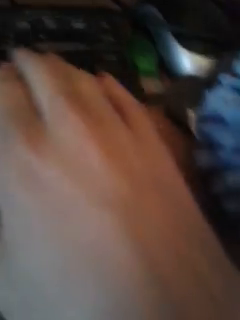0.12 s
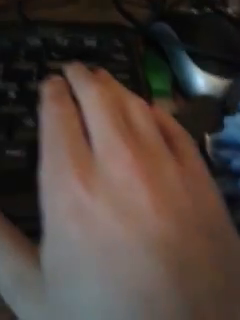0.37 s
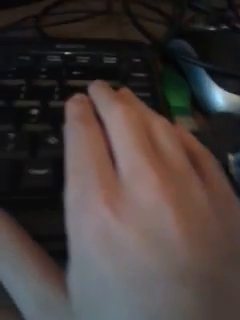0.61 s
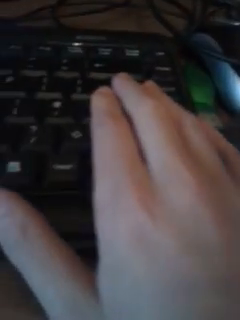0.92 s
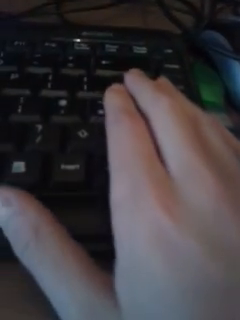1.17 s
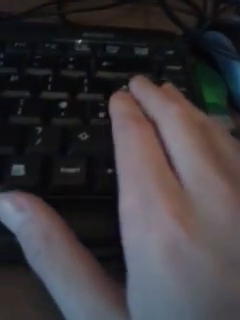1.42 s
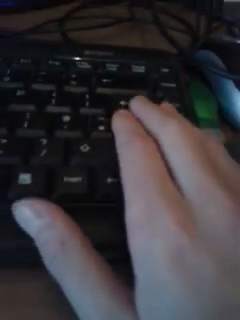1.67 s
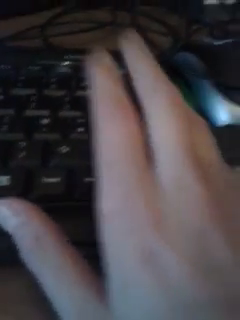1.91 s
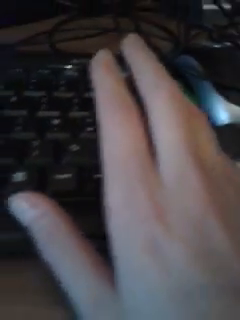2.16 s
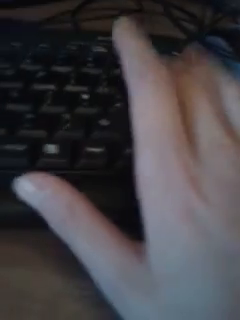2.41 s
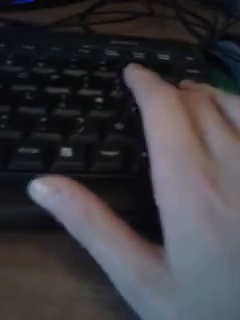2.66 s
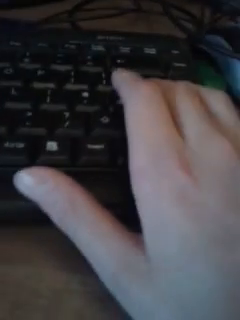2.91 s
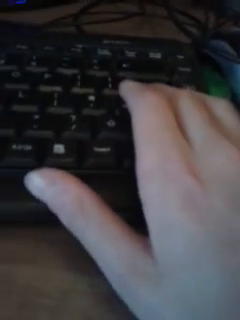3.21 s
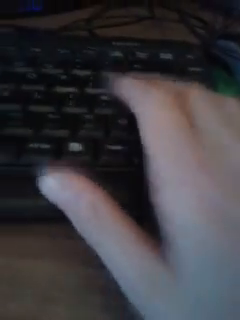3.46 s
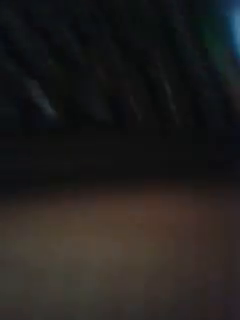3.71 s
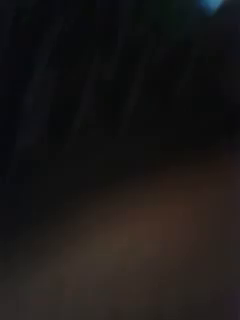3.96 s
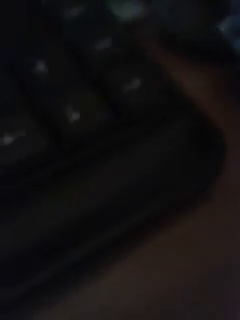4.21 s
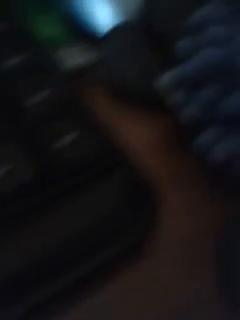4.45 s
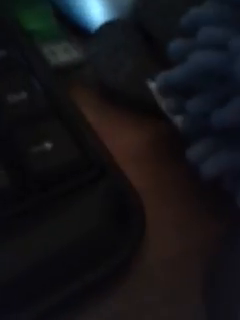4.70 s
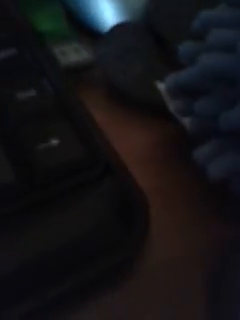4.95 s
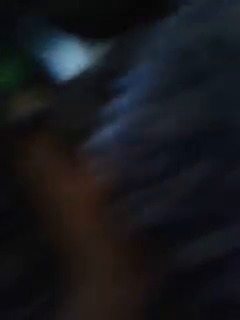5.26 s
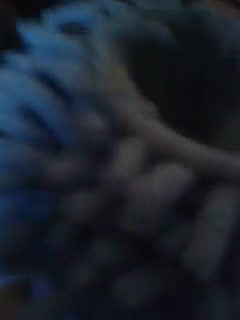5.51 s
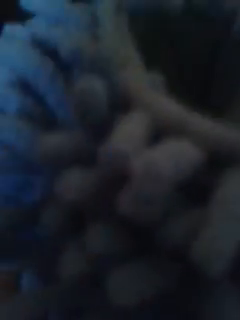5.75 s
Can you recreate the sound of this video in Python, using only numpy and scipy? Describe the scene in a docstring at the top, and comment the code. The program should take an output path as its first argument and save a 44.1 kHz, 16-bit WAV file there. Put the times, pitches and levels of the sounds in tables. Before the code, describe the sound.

Faint plastic ticks in a quiet room, then loud keyboard clacks, a gritty finger slide with a sharp pop, soft knocks and final keystrokes.

```python
"""Soft key clacks and small ticks of a phone's case open the scene; loud keys follow after two seconds.
Then a finger slides over the case as the hand-held phone swings, and the case pops and creaks.
Later a key clacks, a wrist knocks on the desk, and two last keys are struck in the small quiet room.
Each blow is a tiny noisy scrape that sets resonances ringing; slide, cloth brushes and hand jolts
are coloured noise that rises and falls. A steady hiss of microphone and room lies under it all."""
import sys
import numpy as np
from scipy import signal
from scipy.fft import rfft, irfft, next_fast_len
from scipy.io import wavfile
from scipy.ndimage import uniform_filter1d, map_coordinates

SR = 44100
rng = np.random.default_rng(int(sys.argv[2]) if len(sys.argv) > 2 else 0)


def digitize_waveform(pressure):
    """Quantize a signal to 16-bit integers and store it at the path in sys.argv[1].

    Rows of a 2-D input are taken as channels; values are limited to [-1, 1].
    """
    field = np.atleast_2d(pressure).T
    bounded = np.clip(field, -1, 1)
    quanta = np.round(bounded * 32767).astype(np.int16)
    wavfile.write(sys.argv[1], SR, quanta)


def voltage_ratio(decibels):
    """Convert decibels (scalar or array-like) to amplitude ratios, 20 dB per decade."""
    exponent = np.asarray(decibels, float) / 20
    return 10 ** exponent


N = 258867  # samples in the scene

# Every level below comes before the trims and lifts in the functions. Spectrum levels are relative.
# key strokes, one row a key: (rattle f/Hz, snap f/Hz, snap over rattle/dB),
# then its contacts: (t/s, clack level/dB, clack f/Hz, rattle over clack/dB)
KEY_STROKES = [((2740, 5000, -22), [(0.014, -53, 510, -0.5), (0.124, -50, 790, -21), (0.186, -47, 1300, -5),
               (0.214, -42, 1230, -21)]), ((2750, 5100, -4), [(0.324, -49, 1390, -14),
               (0.362, -47, 2370, -10.5), (0.379, -51.5, 1180, -5)]), ((3300, 4400, -0.32),
               [(1.375, -53, 1220, 9)]), ((3500, 5430, -4), [(2.25, -15.5, 1480, -5),
               (2.255, -22, 2350, -13.5), (2.261, -15, 1260, -19), (2.273, -26.5, 970, -10),
               (2.283, -17, 1170, -23), (2.306, -47, 1040, 0), (2.358, -43, 1280, 0),
               (2.364, -23, 995, -22)]), ((3620, 4300, -10.5), [(2.449, -18, 1585, -7),
               (2.454, -27, 880, 2), (2.464, -27.5, 2350, -12), (2.48, -29.5, 880, -17)]),
               ((3800, 4740, -10), [(3.422, -36, 1110, -7.5), (3.434, -39, 1145, -27)]),
               ((2300, 4350, 0.44), [(4.599, -34, 1070, -6.5), (4.606, -23.5, 1570, -11.5),
               (4.61, -22, 1900, -4.5), (4.62, -32.5, 930, -30), (4.633, -46, 1790, -16)]),
               ((3000, 4600, 7.5), [(5.514, -47, 1710, -17), (5.519, -33.5, 1640, -39),
               (5.529, -36.5, 900, 0), (5.546, -38.5, 900, -15)]), ((3420, 5720, -16),
               [(5.796, -27.5, 645, 4.5), (5.806, -26, 950, 1), (5.817, -34, 1040, -14),
               (5.833, -42, 1180, -22), (5.847, -37, 1150, -10), (5.854, -41, 770, -25),
               (5.861, -59, 1140, -18)])]
# ticks of the phone's case: (t/s, clack level/dB, clack f/Hz, rattle over clack/dB, snap over clack/dB)
CASE_TICKS = [(0.249, -62, 430, -13, -6), (0.298, -59, 423, -9, -4), (0.41, -64, 500, -14, -2),
              (0.475, -62, 595, -12, -1), (0.534, -58.5, 711, -14, -6), (0.548, -55, 680, -23, -8),
              (0.58, -58, 732, -23, 3), (0.616, -69.5, 662, -14, 14.5), (0.799, -55, 590, -14, -7),
              (0.879, -58.5, 517, -18, -1), (0.946, -57.5, 514, -8, -1), (1.001, -54, 501, -10, -1.5),
              (1.107, -55, 600, -15, -9.5), (1.192, -49, 650, -21, -12), (1.251, -61.5, 410, -2.5, 1.5),
              (1.286, -66, 401, -6, 9.5), (1.338, -59, 483, -3, 1), (1.686, -50.5, 637, -19, -10.5),
              (1.749, -57.5, 480, -13, -2.5), (3.219, -52.5, 1490, -14, -10), (3.539, -49, 501, -19, -16),
              (3.579, -40.5, 1270, -35, -6), (3.671, -27.5, 1710, -13, -12.5), (3.876, -35, 575, -26, -6),
              (4.05, -29, 1550, -35, -26), (4.054, -25.5, 2140, -35, -6.1), (4.679, -52, 900, -12, -11),
              (4.779, -54, 595, -0.5, -17.5), (4.929, -36.5, 504, -24, -41), (5.365, -36, 564, -41, -34)]
# resonances of keyboard and desk: (f/Hz, width/Hz, level/dB)
BOARD_MODES = [(164, 33, 8.5), (304, 120, -6.5), (487, 198, 13), (701, 160, 11.5), (900, 160, 12.5),
               (1150, 990, 4.5), (1482, 177, 8), (1930, 600, 5), (2800, 320, 3), (3230, 420, 6.5),
               (4050, 330, 2.5), (4740, 2600, -5), (5200, 1500, -3.5), (6800, 2000, 3.5)]
# resonances of the phone's case and microphone port: (f/Hz, width/Hz, level/dB)
CASE_MODES = [(278, 170, 7), (665, 530, 10.5), (1340, 1150, 13), (2520, 1750, -3.5), (3730, 770, 0.5),
              (5270, 3700, -5.5), (7260, 170, -14.5)]
# how long the room takes to die away by 60 dB: (f/Hz, t/s)
ROOM_DECAY = [(250, 0.78), (600, 0.28), (1500, 0.3), (3500, 0.18), (7000, 0.23)]
# the long slide as the phone swings, pausing once: (t/s, hiss level/dB, body level/dB)
SLIDE_LEVELS = [(3.6, -63, -64), (3.63, -46, -59), (3.68, -43.5, -57.5), (3.73, -41, -61), (3.79, -43, -55),
                (3.85, -42.5, -58.5), (3.885, -41.5, -45.5), (3.9, -47, -59.5), (3.96, -46, -54.5),
                (4.04, -58.5, -67.5), (4.08, -67, -59), (4.105, -47, -65), (4.165, -51.5, -61),
                (4.185, -62, -64.5)]
# colour of the skin's hiss: (f/Hz, level/dB)
SKIN_HISS_COLOUR = [(1500, -39.5), (2600, -26.5), (3400, -17), (4300, -15), (5800, -5), (6400, -11),
                    (7000, -10), (9500, -12.5)]
# colour of the case's body sound under the finger: (f/Hz, level/dB)
SKIN_BODY_COLOUR = [(300, -10), (600, 3), (1300, 2), (2300, 3.5), (3500, -1), (5000, -33.5)]
# short finger rubs on the case: (start t/s, end t/s, hiss level/dB, body level/dB)
FINGER_RUBS = [(1.29, 1.3, -52.5, -78), (1.338, 1.35, -56.5, -73), (2.938, 2.956, -51.5, -72),
               (3.25, 3.263, -46, -66), (3.535, 3.558, -51, -62), (3.578, 3.594, -48, -57.5),
               (4.84, 4.88, -56, -56)]
# sleeve and hand brushing the desk: (start t/s, end t/s, level/dB)
DESK_BRUSHES = [(0, .05, -62), (.1, .24, -64.5), (.3, .41, -66), (1.3, 1.45, -66), (3.39, 3.43, -59.5),
                (4.17, 4.3, -68), (4.35, 4.48, -65), (4.78, 4.9, -58.5), (5.18, 5.33, -66)]
# colour of the brushing: (f/Hz, level/dB)
BRUSH_COLOUR = [(300, -23.5), (700, -1.5), (1300, 4.5), (2500, -2.5), (4000, -5), (7000, -7)]
# jolts of the phone in the hand: (t/s, level/dB)
HAND_JOLTS = [(2.32, -64), (3.68, -68.5), (3.821, -70), (3.96, -59.5), (4.07, -68), (4.65, -84),
              (4.89, -81)]
# colour of jolts and tremor: (f/Hz, level/dB)
SHAKE_SPECTRUM = [(12, -35.5), (25, 9.5), (50, -1.5), (80, -9.5), (130, -31), (200, -61.5)]
# colour of the microphone and room hiss: (f/Hz, level/dB)
HISS_COLOUR = [(53, -64.5), (90, -15), (106, -28.5), (249, -7.5), (288, -9), (410, -3.5), (615, -3),
               (1010, -5.5), (1110, -6.5), (2600, -7.5), (3620, -10), (6790, -12.5), (7450, -13.5),
               (9680, -65), (16400, -120)]
# the phone's band limit with a weak leak above it: (f/Hz, level/dB)
PHONE_BAND = [(20, 1.5), (7000, 1.5), (7400, -15), (7900, -21.5), (8500, -36), (9100, -38), (9400, -80)]
# creaks, each a row of even slips: (first slip t/s, end limit t/s, gap t/s, middle level/dB, clack f/Hz)
CASE_CREAKS = [(3.957, 3.98, 0.0065, -33.5, 1660), (4.179, 4.21, 0.013, -45.5, 2450),
               (4.228, 4.249, 0.008, -45.5, 2200)]
# sharp pops, a seam of the case letting go at once: (t/s, level/dB, f/Hz, snap over pop/dB)
CASE_POPS = [(2.937, -48, 1300, 15), (3.251, -40.5, 1420, 6), (3.821, -19.5, 1300, -20)]
# wrist knocks that make the keyboard shudder: (t/s, level/dB, f/Hz, upper ring over knock/dB)
WRIST_KNOCKS = [(4.773, -41, 716, -18), (4.833, -32, 563, 0.7), (4.842, -39, 510, 1.5),
                (4.859, -38, 570, -9), (4.875, -47.5, 570, 3), (4.889, -47, 593, 5.5), (4.92, -43, 526, -2),
                (4.951, -50.5, 486, 1), (4.985, -48.5, 604, -10)]

BLOW_SAMPLES = 16384  # room for one blow and its echo
THUD_HZ = 304.4  # the low thud in every blow
CASE_RATTLE_HZ, CASE_SNAP_HZ = 2990, 5640


def unit(x):
    """Scales a sound to rms 1."""
    return x / np.sqrt(np.mean(x ** 2) + 1e-20)


def along(points, hz):
    """Reads a (f/Hz, value) table on a log pitch axis; the end values hold beyond the ends."""
    f, value = np.transpose(points)
    return np.interp(np.log(hz + 1), np.log(f + 1), value)


def curves(rows):
    """Draws each level column over time, at -120 dB outside its rows."""
    s, *columns = np.transpose(rows)
    t = np.arange(N) / SR
    return [np.interp(t, s, column, -120, -120) for column in columns]


def strokes(rows, attack_s, release_s):
    """Rise, hold, then an exponential fade; one envelope for each level column."""
    t = np.arange(N) / SR
    total = 0
    for start, end, *db in rows:
        rise = np.clip((t - start) / attack_s, 0, 1)
        fade = np.exp(-np.maximum(t - end, 0) / release_s)
        total = total + voltage_ratio(np.array(db))[:, None] * rise * fade
    return total


def wobble(rate):
    """A smooth random curve through `rate` chance values a second."""
    knots = rng.standard_normal(int(N * rate / SR) + 4)
    return map_coordinates(knots, [np.arange(N) * rate / SR])


def coloured(x, spectrum):
    """Filters x through a (f/Hz, level/dB) spectrum."""
    size = next_fast_len(N + 8192)
    gain = voltage_ratio(along(spectrum, np.fft.rfftfreq(size, 1 / SR)))
    return irfft(rfft(x, size) * gain, size)[:N]


def noise(spectrum, grain_db=0):
    """Coloured noise of rms 1; a fast random flutter of its level makes it grainy."""
    white = rng.standard_normal(N)
    return unit(coloured(white * voltage_ratio(grain_db * wobble(300)), spectrum))


def resonance(f, hz, width):
    """A causal resonance with steep skirts."""
    return (1j * f * width / (hz * hz - f * f + 1j * f * width)) ** 2


def echo_tail():
    """A fresh random room answer of energy 1, each frequency dying at its own speed."""
    hz, t, z = signal.stft(rng.standard_normal(BLOW_SAMPLES), SR, nperseg=256)
    fade = voltage_ratio(-60 * t / along(ROOM_DECAY, hz)[:, None])
    tail = signal.istft(z * fade, SR, nperseg=256)[1][:BLOW_SAMPLES]
    tail *= 1 - np.exp(-np.arange(BLOW_SAMPLES) / SR / 0.00035)  # a very quick fade-in
    return tail / np.linalg.norm(tail)


def short_scrape(scrape_ms):
    """A burst of noise that swells for scrape_ms and dies, with an evened-out spectrum."""
    u = np.arange(BLOW_SAMPLES) / SR * 1000 / scrape_ms
    burst = rfft(rng.standard_normal(BLOW_SAMPLES) * u * np.exp(-u))
    even = irfft(burst / uniform_filter1d(abs(burst), size=150), BLOW_SAMPLES)
    return rfft(even * (u < 12))


def contacts(table, modes, scrape_ms, spread, thud_db, treble_db, own_db, sharpness, room_db):
    """Each blow is a scrape: the struck part rings at its own pitches, the body at resonances nearby.

    table: (t/s, clack level/dB, clack f/Hz, rattle f/Hz, rattle/dB, snap f/Hz, snap/dB); spread in octaves.
    """
    out = np.zeros(N + BLOW_SAMPLES)
    f = np.fft.rfftfreq(BLOW_SAMPLES, 1 / SR)
    hz, width, level_db = np.array(modes).T[:, :, None]
    signs = (-1) ** np.arange(len(hz))[:, None]  # neighbours move in opposite directions
    rings = voltage_ratio(level_db) * resonance(f, hz, width) * signs
    for s, db, clack_hz, rattle_hz, rattle_db, snap_hz, snap_db in table:
        scrape = short_scrape(scrape_ms)
        strengths = voltage_ratio(3.5 * rng.standard_normal(len(hz)))
        push_db = thud_db + 0.47 * db  # harder blows have more thud
        parts = [(THUD_HZ, push_db), (clack_hz, 0),
                 (rattle_hz, rattle_db + treble_db), (snap_hz, snap_db + treble_db)]
        blow = to_walls = 0
        for centre_hz, part_db in parts:
            octaves = np.log2(hz[:, 0] / centre_hz)
            near = 1 / (1 + (octaves / spread) ** 4)
            own = voltage_ratio(own_db) * resonance(f, centre_hz, 90 + centre_hz / sharpness)
            body = near * strengths @ rings
            peak = abs(irfft(scrape * (body + own), BLOW_SAMPLES)).max()
            force = voltage_ratio(db + part_db) * scrape / peak
            blow = blow + force * (body + own)
            # the small part beams forward, so the walls hear mostly the body
            to_walls = to_walls + force * (body + 0.37 * own)
        echo = to_walls * voltage_ratio(room_db) * rfft(echo_tail())
        out[round(s * SR):][:BLOW_SAMPLES] += irfft(blow + echo, BLOW_SAMPLES)
    return out[:N]


def background_hiss():
    """Microphone and room hiss: steady coloured noise."""
    return voltage_ratio(-64.5) * noise(HISS_COLOUR)


def hand_tremor():
    """Low noise from the hand: a faint wavering tremor, with jolts that swell and fade."""
    t = np.arange(N) / SR
    jolts = sum(voltage_ratio(db) * np.exp(-abs(t - s) / 0.05) for s, db in HAND_JOLTS)
    tremor = voltage_ratio(-82.5 + 0.5 * wobble(4.9))
    return (jolts + tremor) * noise(SHAKE_SPECTRUM)


def desk_brushing():
    """Sleeve and hand rub the desk: grainy noise in soft strokes."""
    envelope = strokes(DESK_BRUSHES, attack_s=0.022, release_s=0.049)[0]
    return envelope * noise(BRUSH_COLOUR, grain_db=-1.5)


def finger_on_case():
    """Skin friction makes a grainy hiss and a lower body sound, in short rubs and one long slide."""
    rubs = strokes(FINGER_RUBS, attack_s=0.006, release_s=0.0026)
    hiss, body = rubs + voltage_ratio(np.array(curves(SLIDE_LEVELS)))
    skin_hiss = hiss * noise(SKIN_HISS_COLOUR, grain_db=1.7)
    return skin_hiss + body * noise(SKIN_BODY_COLOUR, grain_db=3.5)


def case_pops():
    """One abrupt push into the whole case, hardly any ring; a creak is a quick row of small ones."""
    creak_snap_db, slip_scatter_db = -20, 2.5
    slips = []
    for first, last, gap, db, hz in CASE_CREAKS:
        for s in np.arange(first, last, gap):
            slip_db = db + slip_scatter_db * rng.standard_normal()
            slips.append((s, slip_db, hz, creak_snap_db))
    table = [(s, db, hz, CASE_RATTLE_HZ, -24, CASE_SNAP_HZ, snap_db)
             for s, db, hz, snap_db in list(CASE_POPS) + slips]
    return contacts(table, CASE_MODES, scrape_ms=0.068, spread=0.99, thud_db=-15, treble_db=-12,
                    own_db=9, sharpness=4.4, room_db=-16)


def case_ticks():
    """Plastic ticks right at the microphone, almost dry; their high pitches vary by chance."""
    s, db, hz, rattle_db, snap_db = np.transpose(CASE_TICKS)
    scatter = [0.061, 0.031]  # of rattle and snap pitch, as natural logs
    rattle, snap = np.exp(rng.standard_normal((len(s), 2)) * scatter).T
    table = zip(s, db, hz, CASE_RATTLE_HZ * rattle, rattle_db, CASE_SNAP_HZ * snap, snap_db)
    ticks = contacts(table, CASE_MODES, scrape_ms=0.65, spread=0.32, thud_db=-13.0, treble_db=15.0,
                     own_db=5.5, sharpness=14.8, room_db=-22)
    return voltage_ratio(-5.5) * ticks


def desk_knocks():
    """The wrist's soft blows: each rings broadly and wakes mainly the resonances near its pitches."""
    ring_hz, edge_hz, edge_db = 1217, 2450, -15
    table = [(s, db, hz, ring_hz, ring_db, edge_hz, edge_db) for s, db, hz, ring_db in WRIST_KNOCKS]
    return contacts(table, BOARD_MODES, scrape_ms=0.58, spread=0.27, thud_db=-11, treble_db=2,
                    own_db=15.5, sharpness=4.3, room_db=-2)


def keyboard():
    """Keys bottom out and spring back at arm's length, in the room."""
    table = []
    for (rattle_hz, snap_hz, over_db), hits in KEY_STROKES:
        for s, db, hz, rattle_db in hits:
            table.append((s, db, hz, rattle_hz, rattle_db, snap_hz, rattle_db + over_db))
    keys = contacts(table, BOARD_MODES, scrape_ms=0.97, spread=0.66, thud_db=-16.0, treble_db=5.0,
                    own_db=16, sharpness=18.4, room_db=-5.0)
    return voltage_ratio(-4.5) * keys


def scene():
    """All sources add up at one microphone."""
    handling = hand_tremor() + desk_brushing() + finger_on_case()
    case = case_pops() + case_ticks()
    mix = background_hiss() + handling + case + desk_knocks() + keyboard()
    return mix[None]


def band_limit(x):
    """A steep low-pass at the top of the band."""
    return signal.sosfilt(signal.butter(12, 7600, fs=SR, output="sos"), x)


def record(dry):
    """The phone limits the band, and its converter adds a small steady offset."""
    mix = coloured(dry[0], PHONE_BAND) + 0.0047
    return band_limit(mix[None])


dry = scene()
out = record(dry)
digitize_waveform(out)
```